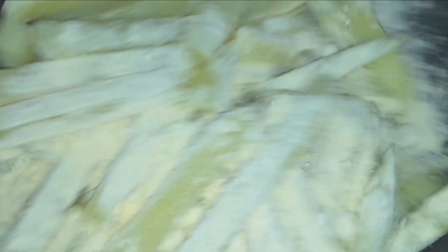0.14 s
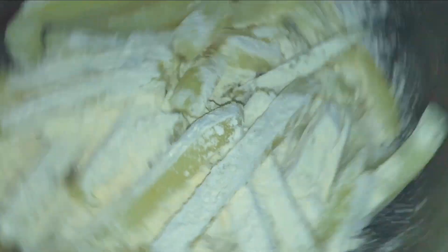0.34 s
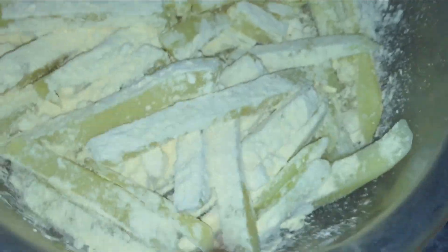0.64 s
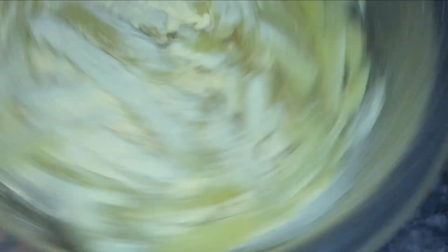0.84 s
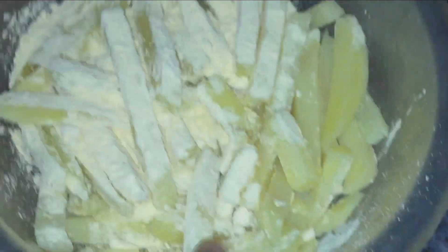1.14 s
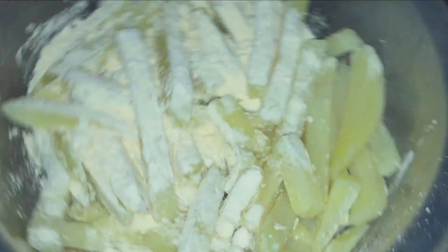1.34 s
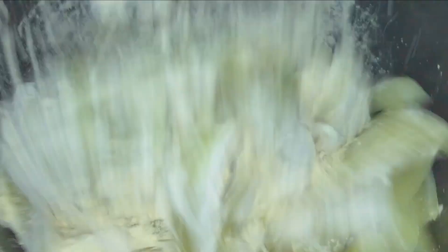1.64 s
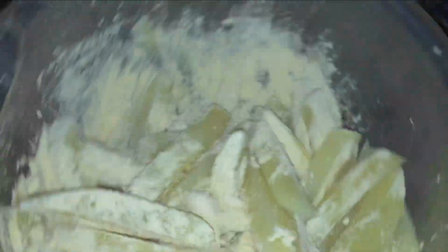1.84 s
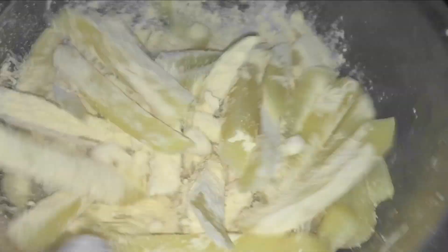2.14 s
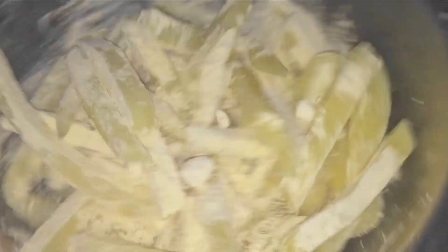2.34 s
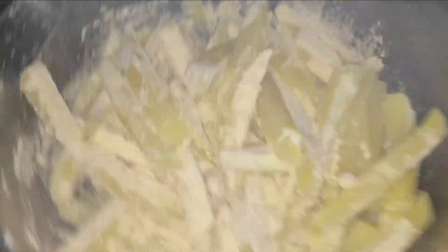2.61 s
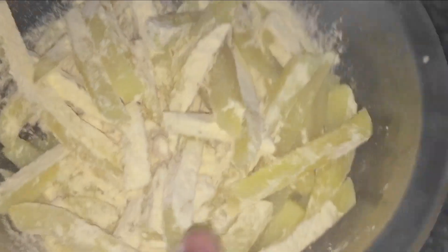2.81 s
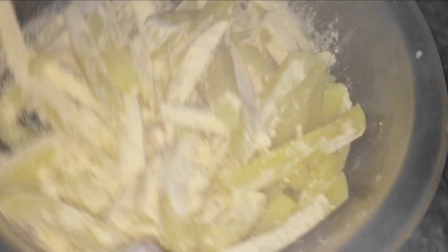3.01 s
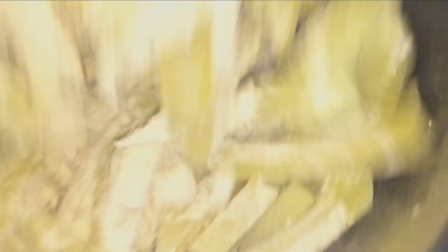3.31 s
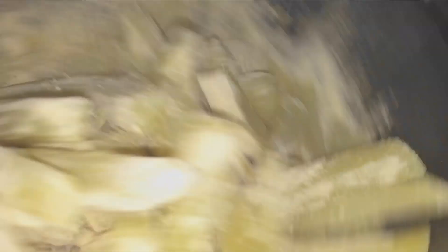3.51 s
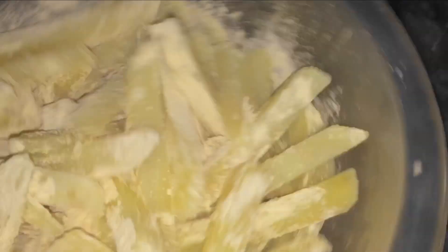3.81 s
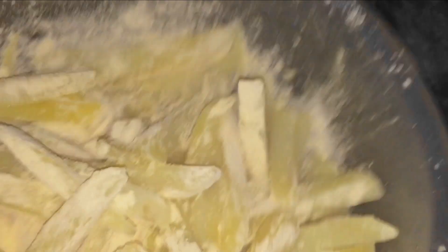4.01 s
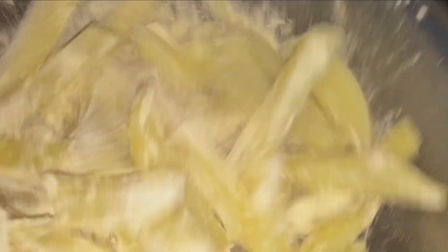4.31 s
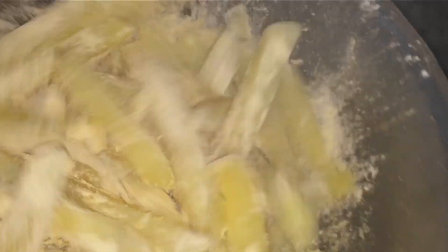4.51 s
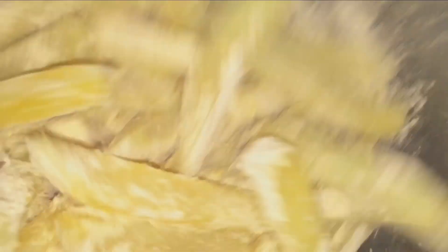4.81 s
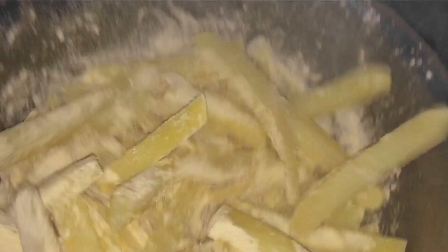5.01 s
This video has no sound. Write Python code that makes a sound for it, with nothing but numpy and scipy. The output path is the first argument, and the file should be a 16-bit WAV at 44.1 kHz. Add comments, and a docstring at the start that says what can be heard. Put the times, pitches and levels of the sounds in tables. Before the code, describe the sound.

A quiet kitchen heard close up, with faint bassy room tone and soft, uneven rumble from a handled bowl. Raw potato strips in flour give a short pitched clack at 0.1 s, lighter taps, then a strong ringing knock with a low thump at 0.47 s and another near 0.56. From about 0.8 to 1.1 s the heap slides in a dry, grainy rustle with powdery hiss. Near-quiet follows until a run of soft dull thuds at 1.7-1.85 s. Small knocks and brief rustles pass from 2 to 2.7 s; a double knock and slide come at 2.8. After a lull, strips tumble thickly at 3.4-3.6 s, trailing tiny taps. Another lull leads to brisker, slightly higher thuds around 4.4, 4.65 and 4.88 s, the last strongest. A hard, tightly clustered bowl knock lands at 5.1 s, flour trickling after it. Echoes are short.

```python
"""A quiet kitchen, close up: raw potato strips are shaken and tossed in flour in a bowl.
Strips knock on the bowl wall and make it ring; short pitched taps and clacks sound alone or within knocks.
The floury heap slides with a hiss of many tiny clicks; strips tumble and land in runs of soft thuds.
Flour trickles after the knocks, the handled bowl rumbles, and a short echo and faint room tone surround it."""
import sys
import numpy as np
from scipy import signal
from scipy.fft import rfft, irfft, next_fast_len
from scipy.io import wavfile

SR = 44100
rng = np.random.default_rng(int(sys.argv[2]) if len(sys.argv) > 2 else 0)


def file_out(sig):
    """Save sig as 16-bit WAV at sys.argv[1]."""
    # one column per channel
    cols = np.atleast_2d(sig).T
    # limit, then scale
    lim = np.clip(cols, -1, 1)
    pcm = np.round(lim * 32767).astype(np.int16)
    wavfile.write(sys.argv[1], SR, pcm)


N = 227115
TIME = np.arange(N) / SR
BLOW = TIME[:SR // 8]   # time within one short blow, in seconds

# Hard knocks on the bowl, with relative levels:
# start_s [s], ring_db of the wall [dB], thump_db of the whole bowl [dB], cushion_db by flour [dB]
KNOCK_EVENTS = [(0.0273, -40.5, -47, 36), (0.0747, -38.5, -56, 44), (0.1168, -20, -48, 17.5),
                (0.2129, -35.5, -60, 15), (0.3665, -32, -72, 25.5), (0.4735, -14, -20, 15),
                (0.5637, -20, -41, 23.5), (0.5746, -32.5, -30.5, 24), (0.9834, -35.5, -34.5, 12),
                (0.994, -33.5, -40, 15), (1.9741, -26.5, -36.5, 23), (2.0052, -36.5, -38, 42),
                (2.1319, -46.5, -43, 19), (2.21, -35, -47, 17), (2.254, -36.5, -46, 29),
                (2.34, -47, -47, 50), (2.453, -43, -56, 18), (2.6594, -29, -33.5, 40),
                (2.8067, -24, -26.5, 20), (2.814, -22.5, -22.5, 24), (3.299, -51, -47.5, 12),
                (3.3466, -54, -47, 18), (3.447, -42.5, -45, 9.5), (4.274, -46, -42.5, 21),
                (4.6485, -29, -55, 29.5), (4.745, -59, -52, 15), (4.8754, -32, -45, 35),
                (5.0996, -12, -16, 15), (5.102, -44, -14, 32), (5.1133, -20, -27, 53),
                (5.117, -14.5, -18, 42)]
# Sound of strips rubbing and coarse flour: pitch_hz [Hz], level_db [dB per Hz, relative]
RUSTLE_SPECTRUM = [(200, -31), (450, -11), (650, -3), (830, 1), (1080, 5.5), (1600, -2), (2400, 2),
                   (3200, -3), (4000, -9.5), (4900, -14.5), (5800, -15.5), (8000, -28.5), (16000, -53.5)]
# Hiss of fine, loose flour: pitch_hz [Hz], level_db [dB per Hz, relative]
POWDER_SPECTRUM = [(1500, -20), (3800, 2), (4800, -5), (5800, -1), (7300, -9), (9000, -8), (10500, -16),
                   (12000, -11.5), (16000, -21)]
CLACK_LOSES = 0.31   # cushioning takes all its dB off the crack and this share off the clack


def from_db(db):
    """Turn decibels into an amplitude factor."""
    return 10 ** (np.asarray(db) / 20)


def rms_one(x):
    """Scale a steady sound to an rms of 1."""
    return x / np.sqrt(np.mean(x ** 2) + 1e-20)


def energy_one(x):
    """Scale a short sound to a total energy of 1."""
    return x / np.sqrt(np.sum(x ** 2) + 1e-20)


def at_level(sound, db):
    """Scale a short sound so that its energy equals 10 ms at this rms level."""
    return from_db(db) * np.sqrt(SR / 100) * energy_one(sound)


def at_hz(points, hz):
    """Read a table on a log-frequency axis."""
    known, value = np.transpose(points)
    return np.interp(np.log(np.maximum(hz, 1)), np.log(known), value)


def cut(x, hz, kind, order=2):
    """Keep only the low, high or middle part of a sound."""
    sos = signal.butter(order, np.clip(hz, 10, .45 * SR), kind, fs=SR, output="sos")
    return signal.sosfilt(sos, x)


def resonate(x, hz, width_hz):
    """Let a sound drive one damped resonance; a wider one dies sooner."""
    r = np.exp(-np.pi * width_hz / SR)
    drive = np.array([1, 0, -1]) * (1 - r * r) / 2
    feedback = [1, -2 * r * np.cos(2 * np.pi * hz / SR), r * r]
    return signal.lfilter(drive, feedback, x + 1e-18)


def colour(x, spectrum):
    """Shape a steady sound with a spectrum and bring it to an rms of 1."""
    size = next_fast_len(N)
    gain = from_db(at_hz(spectrum, np.fft.rfftfreq(size, 1 / SR)))
    return rms_one(irfft(rfft(x, size) * gain, size)[:N])


def dying(t60, t=BLOW):
    """Fade that falls by 60 dB in t60 seconds."""
    return np.exp(-np.log(1000) * t / t60)


def grains(per_s, spread_db):
    """Make random clicks of uneven size and either sign."""
    clicks = rng.random(N) < per_s / SR
    size = from_db(spread_db * np.clip(rng.standard_normal(N), -2, 2))
    return clicks * rng.choice([-1, 1], N) * size


def wander(per_s):
    """Slow chance with a spread of 1; the filter's first second is left out."""
    return rms_one(cut(rng.standard_normal(N + SR), per_s, "low")[SR:])


def swells(rows, curve, column):
    """Gain of overlapping movements; each is a tenth as strong one rise before its height and one fall after."""
    power = 0
    for row in rows:
        height_s, rise_s, fall_s = row[:3]
        away = np.maximum((height_s - TIME) / rise_s, (TIME - height_s) / fall_s)
        level_db = row[column] - 20 * np.minimum(away, 10) ** curve
        power = power + from_db(level_db) ** 2
    return np.sqrt(power)


def add(track, s, sound):
    """Mix a short sound into a track at a given second."""
    start = max(round(s * SR), 0)
    track[start:start + len(sound)] += sound[:max(N - start, 0)]


def burst(t60, low_hz, high_hz, order=1):
    """Flour crushed in a contact: a short spray of noise."""
    spray = cut(rng.standard_normal(len(BLOW)) * dying(t60), low_hz, "high")
    return energy_one(cut(spray, high_hz, "low", order=order))


def room_tone():
    """Steady noise of the quiet room, strongest in the bass."""
    # pitch_hz [Hz], level_db [dB per Hz, relative]
    tone_spectrum = [(15, -49.5), (25, -22), (59, -5.5), (108, -2), (166, -1), (249, -27), (863, -41),
                     (1120, -30.5), (1450, -42), (1700, -35), (1890, -34), (12500, -48), (16000, -67)]
    return from_db(-57) * colour(rng.standard_normal(N), tone_spectrum)


def kitchen(x):
    """Diffuse reflections that build up in a few milliseconds; the middle lasts longest, bass and treble die sooner."""
    # Strength of the echo: pitch_hz [Hz], level_db [dB]
    echo_levels = [(100, -7), (300, -12), (600, -14.5), (820, -12), (1100, -11.5), (1600, -17.5),
                   (2500, -16.5), (6000, -14), (14000, -15)]
    # How long it lasts: pitch_hz [Hz], t60_s, the time to fall by 60 dB [s]
    echo_fades = [(100, 0.15), (500, 0.51), (2000, 0.64), (6000, 0.25), (14000, 0.21)]
    t, response = TIME[:SR * 3 // 4], 0
    build_up = 1 - np.exp(-t / 0.001865)
    edges = np.geomspace(50, 18000, 18)
    for low, high in zip(edges, edges[1:]):
        hz = np.sqrt(low * high)
        tail = rng.standard_normal(len(t)) * dying(at_hz(echo_fades, hz), t) * build_up
        band = cut(energy_one(tail), [low, high], "band")
        response = response + from_db(at_hz(echo_levels, hz)) * band
    return signal.fftconvolve(x, response)[:N]


def handling(uneven_db=4.5, rim_uneven_db=3.0):
    """The bowl moved in the hands rumbles softly and unevenly, and its rim sings faintly."""
    # The bowl carried and rocked in the hands: time_s [s], level_db before the unevenness [dB, relative]
    carry_levels = [(0.0, -47), (0.83, -51.5), (1.32, -56), (1.67, -50.5), (1.83, -43.5), (2.28, -46),
                    (2.76, -46.5), (3.28, -56), (3.51, -46.5), (3.76, -49.5), (4.06, -51), (4.35, -66),
                    (4.49, -50), (5.05, -50)]
    # Its rumble: pitch_hz [Hz], level_db [dB per Hz, relative]
    rumble_spectrum = [(20, -19), (40, -5), (60, -6), (90, 5), (140, -8), (200, -9.5), (300, -16),
                       (600, -14), (820, -26.5), (1100, -25), (1500, -31.5), (4000, -51)]
    rim_db, rim_hz, rim_width_hz = -17, 1076, 76   # level against the handling level
    level_db = np.interp(TIME, *np.transpose(carry_levels)) + uneven_db * wander(7)
    rim_ring = resonate(rng.standard_normal(N), rim_hz, rim_width_hz)
    rim_ring = rms_one(resonate(rim_ring, rim_hz, 2 * rim_width_hz))
    rim = from_db(rim_db + rim_uneven_db * wander(8.7)) * rim_ring
    rumble = from_db(-2.5) * colour(rng.standard_normal(N), rumble_spectrum)
    return from_db(level_db) * (rumble + rim)


def settling(t60=0.53, lag_s=.006):
    """Each knock shakes flour loose, which trickles down the wall; less cushioning lets more fine powder fly."""
    coarse, fine, t = np.zeros(N), np.zeros(N), TIME[:SR]
    trickle = dying(t60, t) * (1 - np.exp(-t / lag_s))
    for s, ring_db, _, cushion_db in KNOCK_EVENTS:
        add(coarse, s, from_db(ring_db - CLACK_LOSES * cushion_db - 19) * trickle)
        add(fine, s, from_db(ring_db - cushion_db - 23) * trickle)
    crumbs = cut(colour(grains(per_s=7500, spread_db=4.5), RUSTLE_SPECTRUM), 3600, "low", order=1)
    powder = colour(rng.standard_normal(N), POWDER_SPECTRUM)
    return coarse * crumbs + fine * powder


def sliding():
    """Floury strips rub in countless tiny slips, catching now and then; loose powder hisses above them."""
    # The heap slides over the bowl: height_s, at full speed [s], rise_s [s], fall_s [s],
    # rustle_db [dB, relative], powder_db [dB, relative]
    slide_moves = [(0.5, 0.035, 0.051, -41, -64), (0.62, 0.13, 0.049, -42, -49.5),
                   (0.85, 0.055, 0.1, -35, -51), (0.91, 0.069, 0.051, -32, -31.5),
                   (1.0, 0.087, 0.11, -32.5, -34), (1.08, 0.074, 0.11, -36.5, -50),
                   (1.355, 0.028, 0.032, -47.5, -80), (1.465, 0.055, 0.029, -39, -55),
                   (2.0, 0.044, 0.031, -48.5, -72), (2.1, 0.039, 0.022, -42.5, -46.5),
                   (2.255, .06, 0.056, -44, -62), (2.33, 0.026, 0.0087, -47.5, -70),
                   (2.565, 0.027, 0.075, -59.5, -72), (2.71, 0.034, 0.054, -41.5, -61),
                   (2.83, 0.082, 0.082, -33.5, -44), (3.01, 0.027, 0.054, -58.5, -82),
                   (3.15, 0.028, 0.025, -41.5, -56)]
    slide_curve = 2.12   # a slide swells and fades as a rounded hump
    catch_db, catches_per_s = 1.5, 21.5   # the strips catch and slip as they go
    rustle = colour(grains(per_s=8000, spread_db=4.5), RUSTLE_SPECTRUM)
    powder = colour(grains(per_s=17000, spread_db=0.5), POWDER_SPECTRUM)
    rustle = swells(slide_moves, slide_curve, column=3) * rustle
    powder = swells(slide_moves, slide_curve, column=4) * powder
    return from_db(catch_db * wander(catches_per_s)) * (rustle + powder)


def heap(force, scatter_db):
    """The damped answer of the soft heap and the bowl under it, as a sum of resonances."""
    # pitch_hz [Hz], width_hz [Hz], level_db before the scatter [dB, relative]
    heap_modes = [(149, 394, 4), (293, 30, -5.5), (500, 57, 4), (624, 31, 3), (1002, 123, -1)]
    return sum(from_db(db + scatter_db * rng.standard_normal()) * resonate(force, hz, width_hz)
               for hz, width_hz, db in heap_modes)


def tumbling():
    """Many lighter touches of falling strips, flour crumbling between them, and the bowl swaying under the load."""
    # Bouts of loose strips tumbling: height_s [s], rise_s [s], fall_s [s],
    # patter_db [dB, relative], crumbs_db [dB, relative]
    tumble_bouts = [(0.482, 0.004, 0.03, -55, -37), (0.58, .08, 0.093, -51, -61),
                    (1.617, .03, 0.042, -48.5, -51.5), (1.815, 0.14, 0.07, -33.5, -51),
                    (2.82, .025, 0.062, -44.5, -57), (3.32, 0.046, .08, -43, -55),
                    (3.44, 0.03, 0.024, -28.5, -40.5), (3.52, 0.073, 0.096, -30, -52.5),
                    (3.8, 0.25, 0.21, -54, -72), (4.28, 0.064, 0.21, -49.5, -58.5),
                    (4.396, 0.028, 0.031, -33, -45), (4.44, 0.088, 0.064, -28, -47),
                    (4.65, 0.042, 0.061, -26, -46.5), (4.88, 0.051, 0.061, -25, -44.5),
                    (5.125, 0.035, 0.031, -29.5, -40.5)]
    # Flour crumbling between the strips: pitch_hz [Hz], level_db [dB per Hz, relative]
    crumb_spectrum = [(400, -14), (1100, 3), (1600, 2.5), (2500, -5.5), (3800, -11.5), (5200, -21),
                      (9000, -23), (16000, -20.5)]
    tumble_curve = 1.75   # a tumble comes to a sharper point than a slide
    sway_db, sway_hz = -14, 95   # level against the patter, upper pitch limit
    touches = cut(grains(per_s=260, spread_db=3.0), 810, "low", order=3)
    patter = rms_one(heap(touches, scatter_db=1))
    sway = from_db(sway_db) * rms_one(cut(rng.standard_normal(N), sway_hz, "low"))
    crumbs = colour(grains(per_s=2200, spread_db=4.0), crumb_spectrum)
    falling = swells(tumble_bouts, tumble_curve, column=3) * (patter + sway)
    return falling + swells(tumble_bouts, tumble_curve, column=4) * crumbs


def landings(softness=1.276, flex_width_hz=300, flex_db=9, pitch_spread=0.07):
    """A soft strip pushes for about a millisecond and flexes for a few cycles; a longer push gives a duller thud."""
    # Strips landing on the heap: start_s [s], thud_db [dB, relative]
    landing_events = [(0.2842, -46), (0.32, -45.5), (1.3904, -51.5), (1.625, -37), (1.691, -42.5),
                      (1.722, -22.5), (1.8006, -26), (1.819, -22.5), (1.8392, -31.5), (2.3552, -54),
                      (2.523, -51), (2.6212, -44.5), (3.415, -30.5), (3.4338, -29), (3.4429, -20.5),
                      (3.49, -27.5), (3.5055, -30), (3.515, -17.5), (3.5732, -30.5), (3.6342, -43),
                      (3.6873, -39), (3.9566, -52.5), (3.985, -51.5), (4.0279, -52), (4.373, -29),
                      (4.3924, -24), (4.4205, -16), (4.4308, -29), (4.439, -19), (4.4616, -24.5),
                      (4.6183, -33.5), (4.6289, -23.5), (4.6384, -22), (4.666, -22.5), (4.676, -16.5),
                      (4.6854, -35), (4.7424, -48), (4.8566, -19.5), (4.8747, -25.5), (4.8839, -10.5),
                      (4.8986, -18.5)]
    gentle_hz, brisk_hz, brisk_from_s = 437, 605, 4.2   # the last tosses are brisker, their thuds higher
    tick_at_0_db, tick_follows = -36.5, 0.58   # tick under a 0 dB thud; share of the thud's dB it follows
    tick_scatter_db = 3
    boom_db, boom_hz, boom_width_hz = -18, 76.3, 110   # each landing also pushes the whole bowl down
    out = np.zeros(N)
    touch = signal.unit_impulse(len(BLOW))
    boom = cut(resonate(touch, boom_hz, boom_width_hz), 2 * boom_hz, "low")
    chance = np.clip(rng.standard_normal((len(landing_events), 2)), -2, 2)
    for (s, thud_db), (higher, harder) in zip(landing_events, chance):
        base_hz = brisk_hz if s > brisk_from_s else gentle_hz
        pitch_hz = base_hz * np.exp(pitch_spread * higher)
        push = cut(touch, softness * pitch_hz, "low", order=4)
        flex = from_db(flex_db) * resonate(push, pitch_hz, flex_width_hz)
        thud = heap(push + flex, scatter_db=3.5)
        tick = burst(0.042, 900, 1900, order=3)
        tick_db = tick_at_0_db + tick_follows * thud_db + tick_scatter_db * harder
        add(out, s, at_level(thud, thud_db) + at_level(tick, tick_db) + at_level(boom, thud_db + boom_db))
    return out


def taps(t60=0.014, touch_share=.35, dull_hz=3400):
    """Each tap or clack is a short click plus a decaying tone that rings for a moment at its own pitch."""
    # Pitched taps of strip ends, and short pitched clacks and rings within some of the knocks:
    # start_s [s], level_db [dB, relative], pitch_hz [Hz]
    tap_events = [(0.0745, -47, 1190), (0.0745, -42.5, 3100), (0.1167, -18, 2340), (0.1232, -23.5, 1143),
                  (0.2119, -30, 1540), (0.3669, -32, 1585), (1.8393, -42, 1090), (1.893, -56, 1060),
                  (2.337, -46.5, 1570), (3.562, -40.5, 1670.0), (3.5749, -37, 1035), (3.6102, -49, 1090),
                  (3.684, -50.5, 1640), (3.7448, -45.5, 1020), (3.8019, -56, 1075), (3.8436, -56.5, 2030),
                  (3.8708, -52, 1100), (4.439, -30.5, 1030)]
    out = np.zeros(N)
    for s, db, hz in tap_events:
        ring = energy_one(np.sin(2 * np.pi * hz * BLOW) * dying(t60))
        click = burst(0.0073, 0.54 * hz, 1.65 * hz, order=3)
        add(out, s, at_level(ring + touch_share * click, db))
    return cut(out, dull_hz, "low", order=3)


def bowl_ring(modes, scatter_db, detune=0.019):
    """Every blow lands elsewhere and the load shifts, so the modes change in strength and a little in pitch."""
    ring = 0
    chance = np.clip(rng.standard_normal((len(modes), 2)), -2, 2)
    for k, ((hz, db, t60), (louder, sharper)) in enumerate(zip(modes, chance)):
        tone = np.sin(2 * np.pi * hz * (1 + detune * sharper) * BLOW) * dying(t60)
        ring = ring + from_db(db + scatter_db * louder) * tone * (-1) ** k   # every other mode is flipped
    return ring


def knocks(thump_hz=125, thump_width_hz=130, split_hz=1450, slap_share=0.43):
    """Strips slap the wall so it rings and the bowl thumps; the first touch clacks and cracks unless cushioned."""
    # Ringing of the bowl with its load, before each blow's scatter:
    # pitch_hz [Hz], level_db [dB, relative], t60_s, the time to fall by 60 dB [s]
    bowl_modes = [(310, -12, 0.0054), (654, 0.5, 0.033), (764, -5, 0.045), (1033, 1.5, 0.02),
                  (1110, -9, 0.037), (1160, -3, 0.024), (1660, 3.5, 0.0057), (2030, -4.5, 0.024),
                  (2353, -4, 0.009), (3594, -2.5, .005)]
    out = np.zeros(N)
    low_modes = [mode for mode in bowl_modes if mode[0] < split_hz]
    high_modes = [mode for mode in bowl_modes if mode[0] >= split_hz]
    thump = cut(resonate(signal.unit_impulse(len(BLOW)), thump_hz, thump_width_hz), 380, "low")
    for s, ring_db, thump_db, cushion_db in KNOCK_EVENTS:
        slap = slap_share * burst(0.021, 350, 1160, order=4)
        wall = energy_one(bowl_ring(low_modes, scatter_db=6.5, detune=0.03)) + slap
        clack = energy_one(bowl_ring(high_modes, scatter_db=1.5)) + burst(0.024, 1200, 2710, order=3)
        crack = burst(0.015, 2700, 5600)
        wall_db = ring_db + .5
        add(out, s, at_level(thump, thump_db) + at_level(wall, wall_db)
            + at_level(clack, wall_db - CLACK_LOSES * cushion_db) + at_level(crack, wall_db - cushion_db))
    return out


def scene():
    """Mix all the sources; knocks and taps feed the echo at full level, the others a little less or not at all."""
    hard = knocks() + taps()
    soft = landings() + tumbling()
    slide = sliding()
    echo = kitchen(hard + from_db(-4.5) * soft + from_db(-1.5) * slide)
    return (hard + soft + slide + settling() + echo + handling() + room_tone())[None]


def record(dry, hollow_hz=815, hollow_width_hz=90, hollow_depth=0.57, cutoff_hz=16000):
    """A narrow hollow in the middle; the microphone loses the lowest bass and top treble and rounds loud peaks."""
    hollowed = dry - hollow_depth * resonate(dry, hollow_hz, hollow_width_hz)
    coloured = cut(hollowed, 46, "high", order=4)
    rounded = 0.83 * np.tanh(coloured / 0.71)
    steep_cut = signal.ellip(10, .1, 80, cutoff_hz, fs=SR, output="sos")
    return signal.sosfilt(steep_cut, rounded)


dry = scene()
out = record(dry)
file_out(out)
```